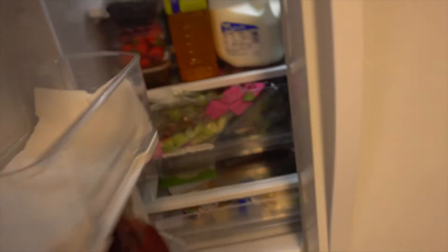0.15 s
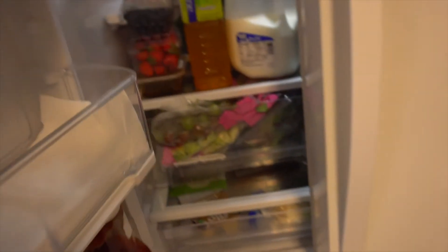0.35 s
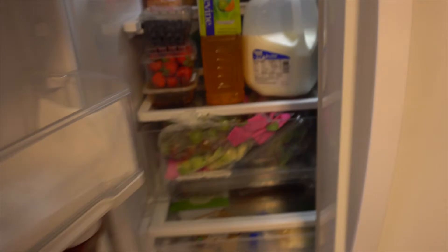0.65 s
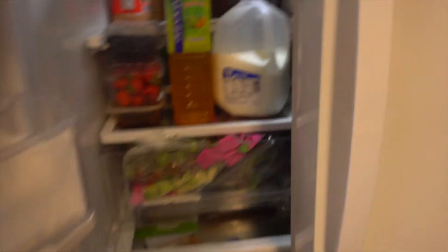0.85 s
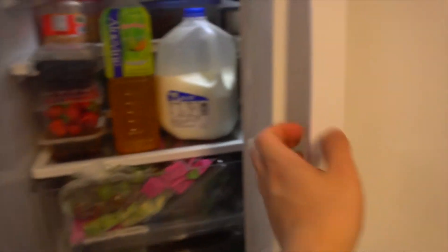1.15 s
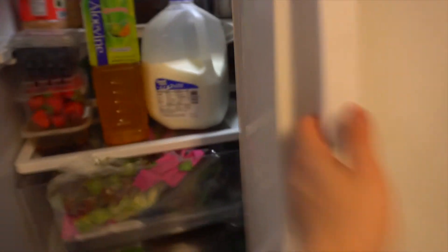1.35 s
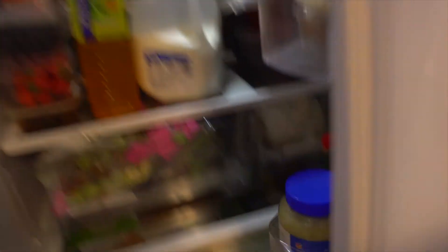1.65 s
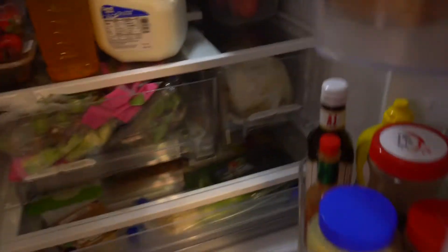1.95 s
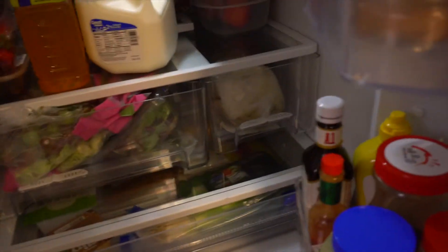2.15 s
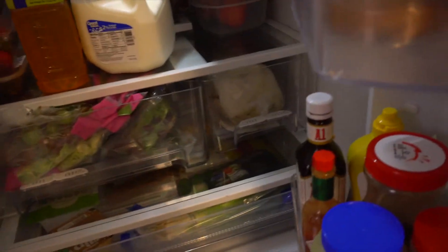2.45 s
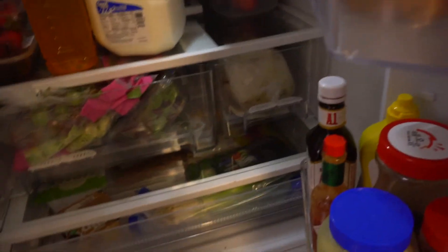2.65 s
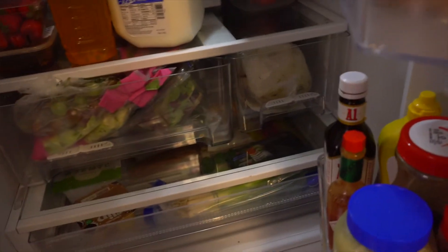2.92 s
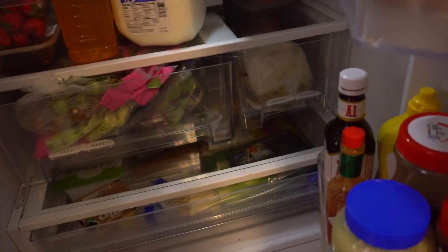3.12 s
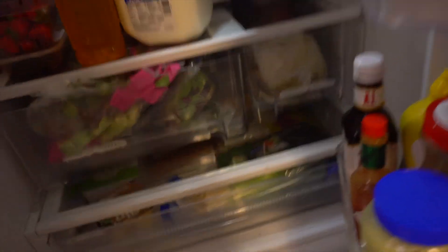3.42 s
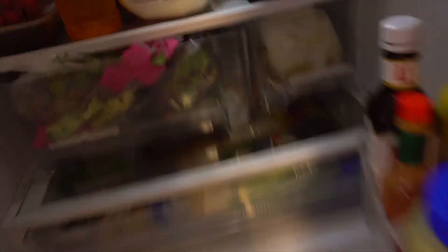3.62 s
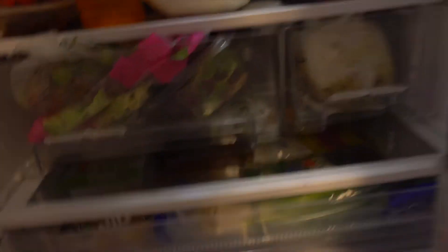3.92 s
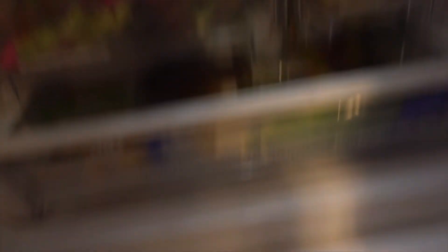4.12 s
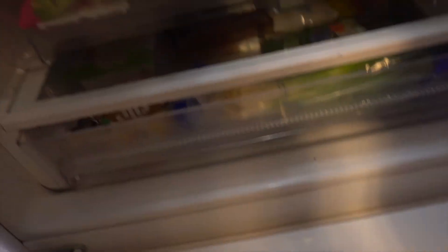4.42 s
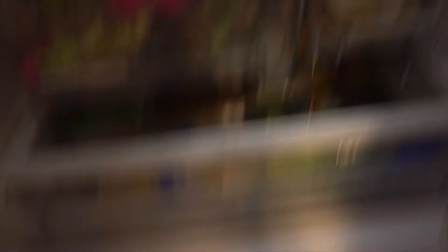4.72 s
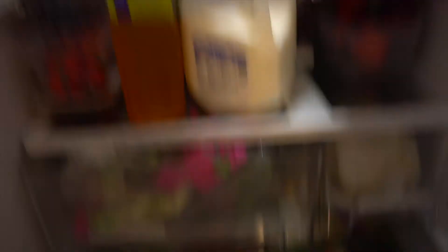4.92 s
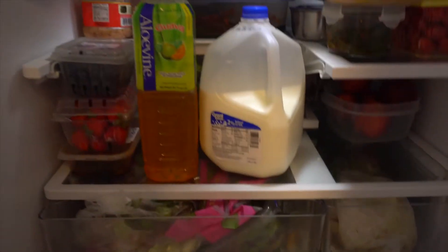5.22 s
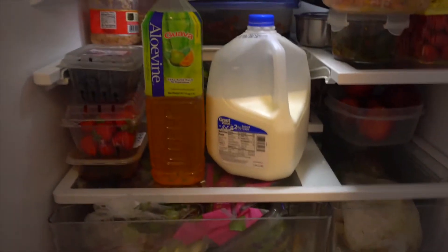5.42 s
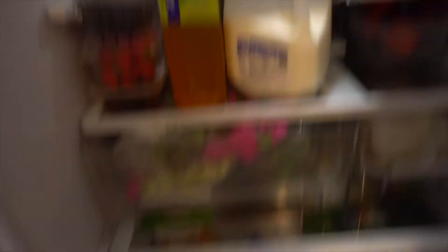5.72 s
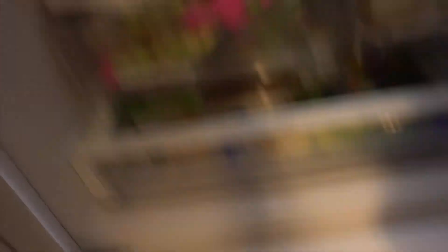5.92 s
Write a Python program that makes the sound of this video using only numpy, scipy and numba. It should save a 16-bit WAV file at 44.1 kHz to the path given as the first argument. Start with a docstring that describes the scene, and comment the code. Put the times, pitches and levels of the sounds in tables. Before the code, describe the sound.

Throughout, a refrigerator fan hums near 190 Hz over soft rushing air, with a faint compressor drone, thin motor whistles and light hiss, heard closely in a kitchen with a short tail. At 0.1 s there is a sharp bright crack and scuff; smaller ticks and scuffs follow at 0.4-0.7 s, with a dull thud and faint clinks near 0.73 s. From 1.05 to 1.22 s hollow knocks tumble quickly; harder ones at 1.31-1.7 s bring deep thuds, scraping and glassy touches as the door opens. A scuff follows at 1.8 s, then a small knock and jar clink at 2.4-2.5 s, weaker taps until 2.74 s. Afterwards the hum dominates. Deep bass shake runs underneath; strong, slow microphone jolts around 3.6-3.8, 4.1-4.45 and 5.7-6.0 s overload briefly, with muffled bumps, dips in level and small crackles.

```python
"""A hand-held camera in a kitchen, its microphone close to an open refrigerator: fan tones over rushing air,
compressor orders and motor whistles run on while hand shake pumps deep bass into the microphone. Soon come
ticks (filtered cracks) and scuffs (grainy noise), then knocks as the second door is hit and pulled open; later
dull cabinet thuds and clinking jars (decaying modes), all with a short room tail. In the second half, stronger
jolts swing the microphone slowly; the strongest overload the input, and short crackles come as it recovers."""
import sys
import numpy as np
from scipy import signal
from scipy.fft import rfft, irfft, next_fast_len
from scipy.io import wavfile
from scipy.ndimage import uniform_filter1d
from numba import njit

SR = 44100
rng = np.random.default_rng(int(sys.argv[2]) if len(sys.argv) > 2 else 0)


def to_wav(sig):
    """Store sig (one row per channel, or 1-D mono) as 16-bit WAV at the path in sys.argv[1].

    Samples outside -1..1 are clipped; the rate is SR.
    """
    pcm = np.clip(np.atleast_2d(sig), -1, 1) * 32767
    pcm = np.round(pcm).astype(np.int16)
    wavfile.write(sys.argv[1], SR, pcm.T)  # frames by channels


N = 267687
T = np.arange(N) / SR
OVERLOAD = 1.14  # largest amplitude the input takes
DOOR_SPREAD_DB = 1.5  # random spread of each tone of door or cabinet


def undb(db):
    """Decibels to an amplitude factor."""
    return 10 ** (np.asarray(db) / 20)


def unit(x):
    """Scale to rms 1."""
    return x / np.sqrt(np.mean(x ** 2))


def curve(rows):
    """Draw straight lines over time between the rows, one curve for each column after the first."""
    s, *columns = np.transpose(rows)
    return [np.interp(T, s, c) for c in columns]


def band(x, lo_hz, hi_hz, order=2):
    """Keep what lies between two pitches."""
    edges = [lo_hz, min(hi_hz, .45 * SR)]
    return signal.sosfilt(signal.butter(order, edges, "bandpass", fs=SR, output="sos"), x)


def noise(shape):
    """Noise of rms 1 coloured by (Hz, dB) points, joined along a logarithmic pitch axis."""
    hz, db = np.transpose(shape)
    n = next_fast_len(N)
    f = np.maximum(np.fft.rfftfreq(n, 1 / SR), 1)
    colour = undb(np.interp(np.log(f), np.log(hz), db))
    return unit(irfft(rfft(rng.standard_normal(n)) * colour, n)[:N])


def walk(rate):
    """Random levels, one every 1 / rate s, joined by slopes; spread near 1."""
    k = int(SR / rate)
    steps = np.repeat(rng.standard_normal(N // k + 1), k)
    return 1.184 * uniform_filter1d(steps, k)[:N]


def add(out, x, s):
    """Lay a sound into the scene from s seconds on."""
    i = int(s * SR)
    out[i:i + len(x)] += x[:N - i]


def near(modes, spot_hz, fall_db):
    """Modes near spot_hz are fed most; others lose fall_db times octaves squared."""
    return [(hz, db - fall_db * np.log2(hz / spot_hz) ** 2, t60) for hz, db, t60 in modes]


def ring(modes, spread_db, rise_s, detune=0.):
    """Decaying sines built up over rise_s; levels differ each time, and close twins beat if detuned."""
    t = T[:SR // 4]
    twin = undb(-5) * (detune > 0)
    tones = np.zeros(len(t))
    for hz, db, t60 in modes:
        luck, shift, twin_shift = rng.standard_normal(3)
        main_tone = np.sin(2 * np.pi * hz * (1 + detune * shift / 2) * t)
        twin_tone = np.sin(2 * np.pi * hz * (1 + detune * twin_shift) * t)
        tones += undb(db + spread_db * luck - 60 * t / t60) * (main_tone + twin * twin_tone)
    return tones * (1 - np.exp(-t / rise_s)) ** 2 / (1 + twin)


def fan():
    """Blades chop the air into a tone with overtones, wavering a little over rushing air."""
    # heard as the camera moves about: t/s, blade tone level/dB rms, air rush level/dB rms,
    # blade overtones over the tone/dB
    distance = [(0.0, -30.5, -32, -14), (0.22, -37, -38, -8.5), (0.9, -33.5, -35, -9.5),
                (1.2, -38.5, -33, -10), (1.52, -33, -28, -13), (1.74, -34.5, -35.5, -18),
                (2.06, -32, -36.5, -15.5), (3.08, -31, -36.5, -15), (3.72, -28, -34, -18.5),
                (4.0, -27.5, -36, -12.5), (4.27, -31, -39, -19.5), (4.66, -27, -35.5, -16),
                (5.24, -35, -40, -15), (5.65, -35.5, -39, -15), (6.07, -29.5, -36.5, -19)]
    # blade overtones: multiple of the blade tone, level/dB
    overtones = [(2, -1), (3, -14)]
    # colour of the rushing air: f/Hz, relative level/dB per Hz
    air_colour = [(30, -17), (55, 14.5), (80, 5.5), (130, 1), (240, 5), (370, -4.5), (450, -6), (620, -9.5),
                  (1000, -15), (1450, -15.5), (1800, -30.5), (3000, -35)]
    blade_hz = 189.4
    blade_db, air_db, over_db = curve(distance)
    turn = 2 * np.pi * np.cumsum(1 + 0.0041 * walk(6.6)) / SR
    blades = undb(blade_db + 1.8 * walk(7)) * np.sin(blade_hz * turn)
    for k, db in overtones:
        blades += undb(blade_db + over_db + db + 2.4 * walk(11)) * np.sin(k * blade_hz * turn)
    air = undb(air_db + 0.51 * walk(15) + 1.12 * walk(60)) * noise(air_colour)
    return np.sqrt(2) * blades + air


def compressor():
    """The pump hums at multiples of its turning rate, each loudest at its own moment."""
    # compressor orders: multiple of the pump rate, level/dB rms at the loudest moment, loudest t/s
    orders = [(2, -46, 5.4), (5, -51, 3.84), (6, -44.5, 3.67), (7, -66, 1.3), (8, -54, 3.36)]
    pump_hz, waver_db = 59.3, 3
    fall_db = 1.6  # lost 1 s away from the loudest moment, growing with the square
    out = np.zeros(N)
    for k, db, s in orders:
        level = undb(db - fall_db * (T - s) ** 2 + waver_db * walk(3.12))
        out += level * np.sin(2 * np.pi * k * pump_hz * T + k)
    return np.sqrt(2) * out


def whistles():
    """Thin motor tones waver: some stay, others are heard while the camera faces them."""
    # tones that stay throughout: f/Hz, level/dB rms
    steady = [(1416, -64.5), (1604, -72)]
    # tones that come and go: level/dB rms, from t/s, to t/s
    facing = [(-69, .3, 4.1), (-76, 4.25, 5.7), (-74, 2.4, 4.15), (-71, 4.4, 5.75), (-71, 5.05, 5.7),
              (-73, 2.0, 4.0), (-72, 4.5, 5.75)]
    # pitch of each row above: f/Hz
    facing_hz = [3031, 3150, 3978, 3978, 3978, 4334, 4334]
    fade_db_s, waver_db = 44, 2  # fade in dB per second outside the facing time
    tones = list(steady)
    for hz, (db, start, end) in zip(facing_hz, facing):
        outside = np.maximum(np.maximum(start - T, T - end), 0)
        tones.append((hz, db - fade_db_s * outside))
    out = np.zeros(N)
    for hz, db in tones:
        out += undb(db + waver_db * walk(3.96)) * np.sin(2 * np.pi * hz * T)
    return np.sqrt(2) * out


def tremor():
    """Tremor of the hand moves the microphone through the air: two bands of deep noise, softly limited."""
    # hand shake before limiting: t/s, slow band level/dB rms, band above 20 Hz over the slow one/dB
    unsteadiness = [(0.0, -18.5, -9), (0.08, -8.5, -14), (1.23, -12.5, -12.5), (1.27, -8, -67),
                    (1.72, -9.5, -4), (1.76, -18.5, -27), (1.94, -12, -16.5), (2.86, -9, -14),
                    (3.08, -25, -3), (3.43, -9.5, -7.5), (3.53, -25, 14.5), (3.62, -2, -10),
                    (4.01, -9.5, 4.5), (4.22, -15, -46), (4.65, -2.5, -96), (4.72, -13.5, -9),
                    (5.19, -7.5, -11), (5.27, -18.5, -10), (5.95, -1, -14.5), (6.07, -19, 0)]
    db, quick_db = curve(unsteadiness)
    # a second of run-in lets the narrow filters settle
    slow = unit(band(rng.standard_normal(N + SR), 7, 18.33, order=4)[SR:])
    quick = unit(band(rng.standard_normal(N + SR), 20, 27.1, order=4)[SR:])
    return .75 * np.tanh(undb(db) * (slow + undb(quick_db) * quick) / .75)


def ticks():
    """Ticks and crackles: one sharp click, then a fading band of noise; higher ones die sooner."""
    # ticks and short crackles, some as the overloaded input recovers:
    # t/s, level/dB, lowest f/Hz, highest f/Hz
    cracks = [(0.093, -16.5, 596, 2200), (0.0928, -30, 2200, 12000), (0.1063, -6, 4600, 5700),
              (0.1067, -11, 2600, 9000), (0.1067, -16, 7950, 15500), (0.108, -12, 790, 1490),
              (.118, -19, 800, 1200), (.3436, -39, 2500, 10000), (0.4231, -21.5, 857, 4300),
              (0.469, -36, 3500, 9000), (0.6517, -28.5, 950, 1340), (0.7317, -21.5, 900, 3530),
              (1.052, -32, 900, 12000), (1.1854, -26, 1500, 15000), (1.193, -36, 1500, 4000),
              (1.3135, -18.5, 1800, 9900), (1.3135, -30, 9000, 13100), (1.344, -21, 2000, 9000),
              (1.3514, -19, 800, 3000), (1.372, -20, 1500, 7040), (1.4615, -23.5, 1200, 3770),
              (1.461, -42, 4000, 10000), (1.594, -28, 2020, 11800), (1.541, -33, 600, 1600),
              (1.623, -26, 700, 3000), (1.635, -32, 900, 1700), (1.6483, -36, 4000, 12000),
              (1.686, -30.5, 810, 3870), (1.7845, -39, 1000, 8000), (1.814, -38, 910, 6000),
              (2.017, -34.5, 6440, 15000), (2.447, -40, 1200, 5000), (3.621, -45, 700, 2000),
              (3.78, -36.5, 500, 2190), (4.12, -40, 800, 1520), (4.195, -47, 500, 2080),
              (4.283, -40, 600, 2160), (4.322, -49, 500, 2250), (4.358, -40, 500, 1110),
              (4.445, -40, 605, 1600), (4.604, -41, 453, 1300), (5.688, -39, 2500, 9050),
              (5.699, -42, 700, 1700), (5.723, -40, 800, 1600), (5.727, -31.5, 2000, 8700),
              (5.759, -40, 600, 1800), (5.918, -42, 900, 2080), (5.981, -36, 3000, 5560)]
    dull_hz = 2900  # they weaken above this
    mid_t60_s, mid_hz, slope = 0.033, 2950, 0.4  # decay at that pitch, and how it shortens upward
    snap_db = -1  # peak of the click, over the level in the table
    out, t = np.zeros(N), T[:SR // 8]
    for s, db, lo_hz, hi_hz in cracks:
        t60 = mid_t60_s * (mid_hz / np.sqrt(lo_hz * hi_hz)) ** slope
        push = np.array([rng.standard_normal(len(t)), t == 0])
        dulled = signal.lfilter([1], [1, -np.exp(-2 * np.pi * dull_hz / SR)], push)
        crack, click = band(dulled, lo_hz, hi_hz, order=1)
        fading = undb(db - 60 * t / t60) * unit(crack) / 2
        add(out, fading + undb(db + snap_db) * click / np.abs(click).max(), s)
    return out


def scuffs():
    """Dense slips of dry surfaces: a bright and a duller band from the same grains; each swells and fades."""
    # scuffs of hand, seal and feet: loudest t/s, level/dB, swell/s, fade t60/s, mid band over treble/dB
    slips = [(0.121, -35, 0.013, 0.29, -13), (0.427, -40.5, 0.052, 0.15, 2), (.47, -46.5, 0.033, 0.44, 8.5),
             (0.699, -48.5, 0.037, 0.24, 7.5), (1.06, -46, 0.0077, 0.059, 13),
             (1.317, -47, 0.0034, 0.059, 19.5), (1.351, -41, 0.0096, 0.15, 14),
             (1.408, -40, 0.011, 0.066, 6.5), (1.445, -49, 0.016, 0.065, 8),
             (1.471, -55.5, 0.012, 0.077, 21), (1.508, -57, 0.0084, 0.1, 23.5),
             (1.558, -62.5, .02, 0.18, 6), (1.599, -45.5, 0.025, 0.18, 8.5), (1.65, -53, 0.0049, 0.18, 15),
             (1.82, -42, 0.017, 0.16, 11.5)]
    swell_db = 11  # rise over the swell time
    bright_hz, mid_hz = 5700, 1320
    grains = rng.standard_normal(N) * undb(2.5 * walk(400) + 0.86 * walk(90))
    treble = band(grains, bright_hz / 1.65, bright_hz * 1.24, order=1)
    bright = unit(treble + 0.037 * band(grains, 1320, 24000))
    mid = unit(band(grains, mid_hz / 1.62, mid_hz * 1.28, order=1))
    out = np.zeros(N)
    for s, db, swell, t60, mid_db in slips:
        at = slice(max(int((s - 2 * swell) * SR), 0), int((s + t60) * SR))
        t = T[at] - s
        level_db = db + np.where(t < 0, swell_db * t / swell, -60 * t / t60)
        out[at] += undb(level_db) * (bright[at] + undb(mid_db) * mid[at])
    return out


def knocks():
    """Knocks on the door are built of parts, each a panel thump and a ring of the modes nearest the spot hit."""
    # parts of the knocks, several rows to one knock: t/s, panel thump level/dB, panel f/Hz, panel t60/s,
    # ring level/dB, f/Hz of the modes at the spot
    knock_parts = [(.106, -24, 230, .05, -35.5, 480), (1.053, -30, 246, .05, -24.5, 655),
                   (1.060, -4, 221, 0.074, -24.5, 690), (1.063, -21, 234, .05, -27, 1490),
                   (1.080, -16, 321, 0.096, -36, 1410), (1.104, -27, 312, 0.052, -41, 1300),
                   (1.126, -12, 217, 0.091, -32.5, 750), (1.160, -26, 357, .06, -39, 950),
                   (1.185, -8, 226, 0.056, -27, 880), (1.190, -11, 292, 0.041, -21.5, 640),
                   (1.203, -18.5, 268, 0.079, -33, 650), (1.220, -23, 240, 0.051, -38, 620),
                   (1.312, -19, 302, .044, -35, 1110), (1.350, -0.5, 192, 0.035, -16, 980),
                   (1.369, -4.5, 285, 0.07, -18.5, 910), (1.376, 6, 236, 0.032, -16, 444),
                   (1.461, 7, 260.5, 0.038, -29, 690), (1.474, -15, 332, 0.055, -27, 394),
                   (1.537, -30, 245, 0.042, -27.5, 500), (1.543, -27, 242, 0.049, -33, 1200),
                   (1.621, -20, 307, 0.049, -29.5, 764), (1.629, -13, 410, .044, -27.5, 1290),
                   (1.650, -21, 302, 0.058, -44, 1400), (1.685, -2, 269, 0.054, -32, 985),
                   (1.697, -13.5, 455, 0.042, -36, 1480), (2.444, -9.5, 375, 0.035, -38, 503),
                   (2.460, -23.5, 425, 0.051, -38, 746), (2.478, -28, 376, .07, -56, 500),
                   (2.599, -26, 412, 0.068, -39.5, 695), (2.738, -24, 432, 0.045, -43, 740)]
    # door modes: f/Hz, relative level/dB, t60/s
    door_modes = [(333, 10, 0.056), (360, 4, 0.14), (428, 5.5, 0.102), (486, -0.5, 0.2),
                  (622.5, 6.5, 0.087), (740, 0.5, 0.057), (853, 4, 0.042), (919, 1.5, 0.079),
                  (1086, 5.5, 0.042), (1210, 4, 0.04), (1407, -0.5, 0.12), (1544, -8, 0.066)]
    out = np.zeros(N)
    for s, db, hz, t60, ring_db, spot_hz in knock_parts:
        add(out, ring([(hz, db, t60)], spread_db=DOOR_SPREAD_DB, rise_s=0.0023), s)
        fed = near(door_modes, spot_hz, fall_db=32.5)
        add(out, undb(ring_db) * ring(fed, spread_db=DOOR_SPREAD_DB, rise_s=0.00059, detune=.025), s)
    return out


def thuds():
    """Dull thuds of the cabinet: one low decaying tone each, slow to build up."""
    # thuds: t/s, level/dB, f/Hz, t60/s
    dull_tones = [(0.73, -10.5, 141, 0.053), (1.077, -18, 101.8, 0.5), (1.279, -17, 66, 0.26),
                  (1.332, -3, 71, 0.16), (1.48, 2, 68, 0.21), (1.473, -8, 128.6, 0.23),
                  (1.671, -4.5, 63.5, 0.085), (2.134, -19, 76.6, 0.35), (2.48, -21.5, 78.5, 0.24),
                  (3.735, -30, 95, 0.1), (3.769, -27, 108, .08), (4.162, -13, 91, 0.13),
                  (5.69, -22.5, 124.6, 0.19)]
    out = np.zeros(N)
    for s, db, hz, t60 in dull_tones:
        add(out, ring([(hz, db, t60)], spread_db=DOOR_SPREAD_DB, rise_s=0.0062), s)
    return out


def clinks():
    """Jars touching on the door shelves ring short glassy modes, most those nearest the spot."""
    # touches: t/s, level/dB, f/Hz of the strongest modes
    touches = [(0.731, -42, 3000), (0.733, -39, 1400), (0.744, -41, 1450), (0.751, -38, 2950),
               (1.501, -31, 2100), (1.507, -33, 2000), (1.592, -41, 1800), (2.378, -35, 1550),
               (2.397, -44, 1240), (2.447, -46, 1500)]
    # jar modes: f/Hz, relative level/dB, t60/s
    jar_modes = [(819, 12, 0.07), (1050, -2, 0.053), (1196, -3, 0.19), (1430, 5, 0.05), (1880, -1.5, 0.058),
                 (2090, 2.5, 0.04), (2350, 2.5, 0.031), (2600, 1, 0.041), (2900, -9, 0.13),
                 (3080, -3, 0.11), (4130, -4, 0.045)]
    out = np.zeros(N)
    for s, db, spot_hz in touches:
        fed = near(jar_modes, spot_hz, fall_db=21.0)
        add(out, undb(db) * ring(fed, spread_db=1.5, rise_s=0.00021, detune=.01), s)
    return out


def room(x, t60, wet_db):
    """Kitchen tail: fading noise, duller than the source."""
    t = T[:SR // 2]
    tail = band(rng.standard_normal(len(t)), 400, 11500, order=1) * undb(-60 * t / t60)
    return undb(wet_db) * signal.fftconvolve(x, tail / np.sqrt(np.sum(tail ** 2)))[:N]


def jolts():
    """Jolts of the hand set the camera swinging; also returns the share of tremor left beside them."""
    # jolts: t/s, first swing as a share of the overload point, length/s, swing f/Hz, head start/cycles
    swings = [(3.584, 1.05, .17, 11.26, 0.17), (3.752, -1.01, 0.082, 13.3, 0.22),
              (4.113, 0.78, 0.044, 14.3, 0.048), (4.169, 1.04, 0.074, 11, 0.39),
              (4.278, -1.05, 0.198, 12, 0.014), (5.7, -1.07, 0.076, 12, 0.39),
              (5.917, -0.61, 0.16, 10.7, 0.032)]
    edge_s, quick_s = 0.0193, 0.02515  # onset and end; how soon the swing slows
    sharpness = .999  # near 1: nearly straight slopes with sharp turns
    out, calm = np.zeros(N), np.ones(N)
    for s, size, length, hz, head in swings:
        t = T - s
        cycles = hz * t + head * (1 - np.exp(-np.maximum(t, -quick_s) / quick_s))
        swing = np.arcsin(sharpness * np.cos(2 * np.pi * cycles)) / np.arcsin(sharpness)
        outside = np.maximum(np.maximum(-t, t - length), 0)
        held = np.exp(-(outside / edge_s) ** 2)
        out += OVERLOAD * size * held * swing
        calm *= 1 - held  # a jolt takes over from the tremor
    return out, calm


def scene():
    """Close sounds and crackles with a kitchen tail, the running refrigerator and the shaken microphone."""
    running = fan() + compressor() + whistles()
    close = ticks() + scuffs() + knocks() + thuds() + clinks()
    swinging, calm = jolts()
    shake = calm * tremor() + swinging
    return (close + room(close, t60=0.27, wet_db=-11.0) + running + shake)[None]


@njit
def follow(x, attack, release):
    """Peak follower, quick up and slow down."""
    e, out = 0., np.empty(len(x))
    for i in range(len(x)):
        a = abs(x[i])
        e += (a - e) * (attack if a > e else release)
        out[i] = e
    return out


def overload(x):
    """Clip hard; coming out of it the input rasps for a moment, then the gain sags and returns."""
    over = uniform_filter1d(1. * (np.abs(x) > OVERLOAD), size=40) > .5
    freed = 1. * (np.diff(1. * over, prepend=0) < 0)
    moment = int(0.00896 * SR)
    rasping = np.minimum(np.convolve(freed, np.hanning(moment) ** .5)[:N], 1)
    rasp = undb(-43.5) * rasping * unit(band(rng.standard_normal(N), 630, 1260))
    recovery = np.exp(-1 / (0.0067 * SR))
    sag = np.minimum(signal.lfilter([1], [1, -recovery], np.roll(freed, moment)), 1)
    return (np.clip(x, -OVERLOAD, OVERLOAD) + rasp) * undb(-6 * uniform_filter1d(sag, size=150))


def record(dry):
    """Preamp hiss, a hard overload, a coupling capacitor, gain control that recovers slowly, then the top cut."""
    # colour of the preamp hiss: f/Hz, relative level/dB per Hz
    hiss_colour = [(1060, -49), (1800, 1.5), (3710, -2.5), (4100, -4), (4620, -3.5), (15100, -13.5),
                   (16000, -6)]
    x = overload(dry[0] + undb(-57.5) * noise(hiss_colour))
    x = signal.sosfilt(signal.butter(1, 5., "highpass", fs=SR, output="sos"), x)
    # gain control: 6.1 ms attack, 0.8 s release, working above a peak level of 0.62
    peak = follow(x, 1 / (0.0061 * SR), 1 / (.8 * SR))
    x = x * np.minimum(1, 0.62 / (peak + 1e-9)) ** 0.43
    x = signal.sosfilt(signal.ellip(10, .2, 80, 15900, fs=SR, output="sos"), x)
    return np.clip(x, -1, 1)[None]


dry = scene()
out = record(dry)
to_wav(out)
```